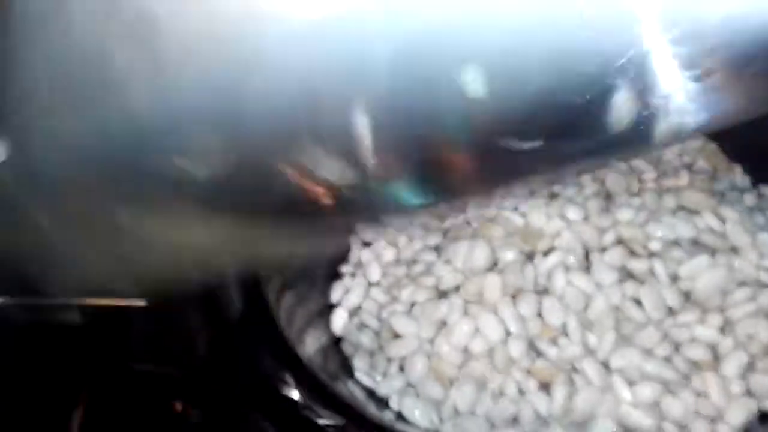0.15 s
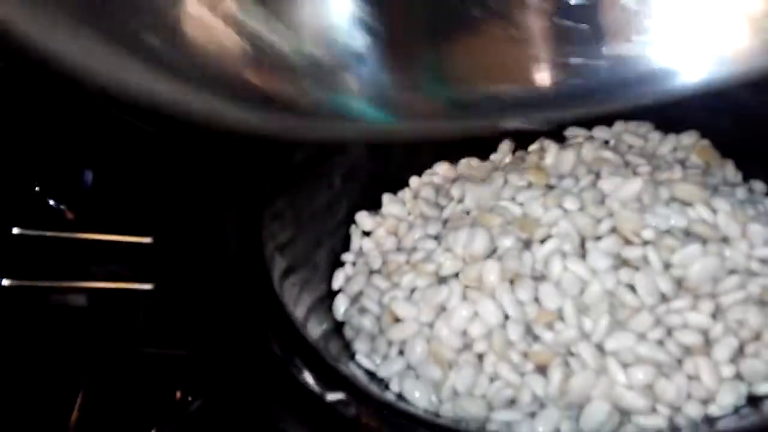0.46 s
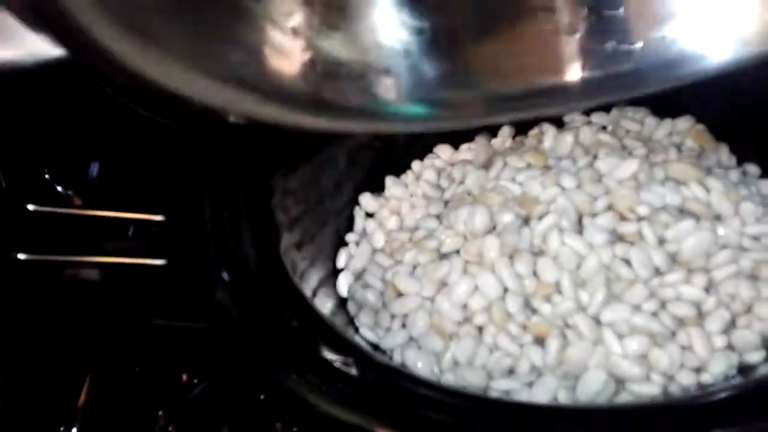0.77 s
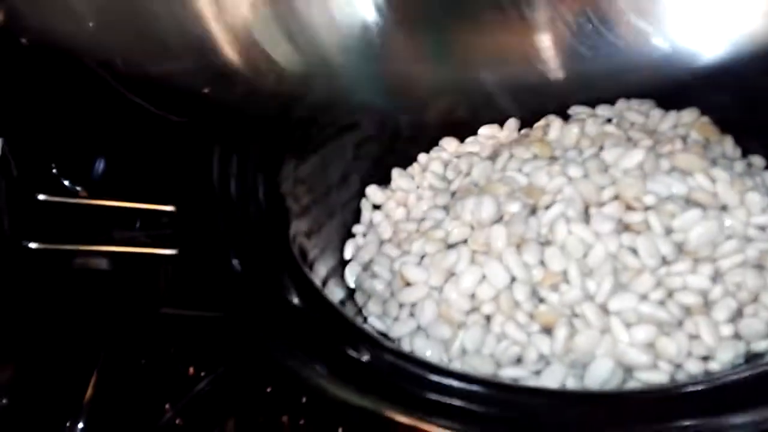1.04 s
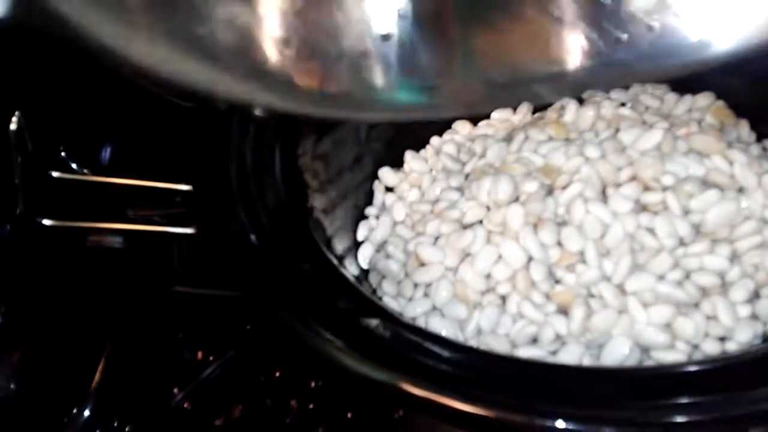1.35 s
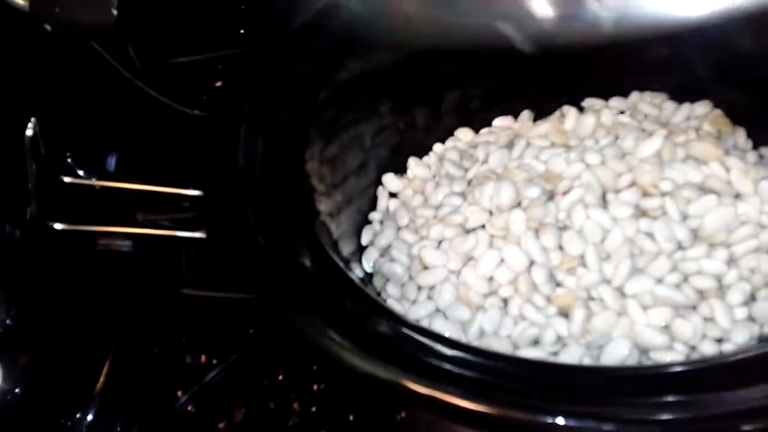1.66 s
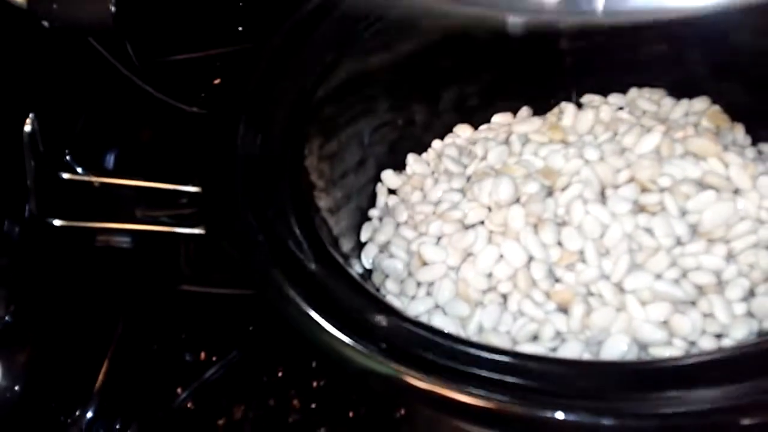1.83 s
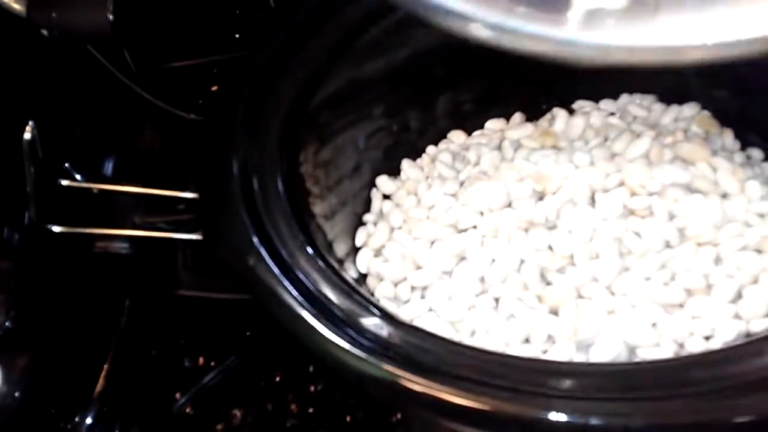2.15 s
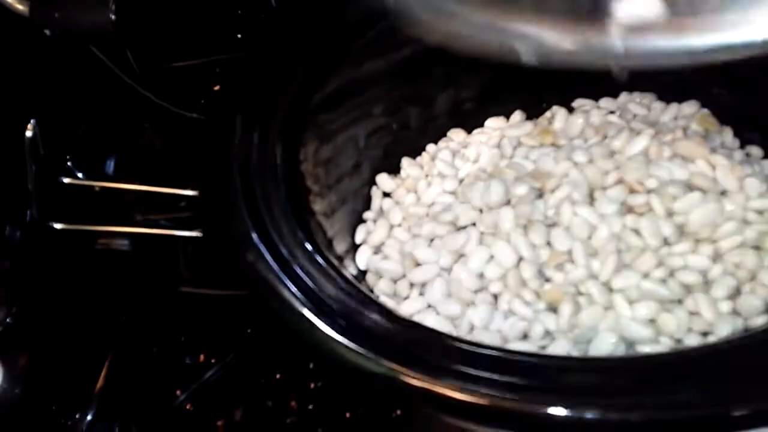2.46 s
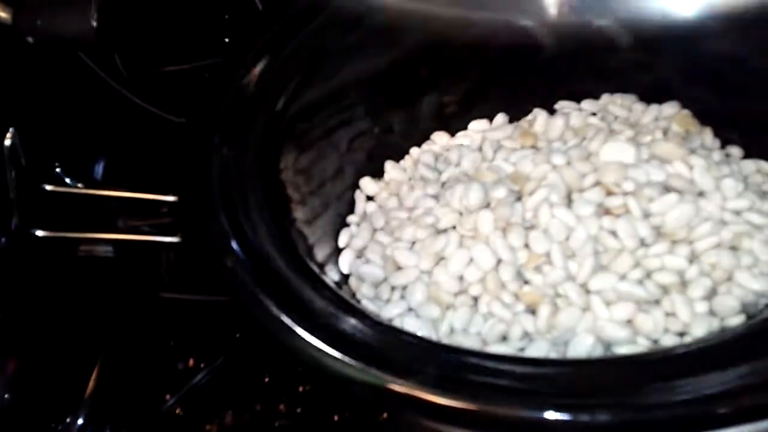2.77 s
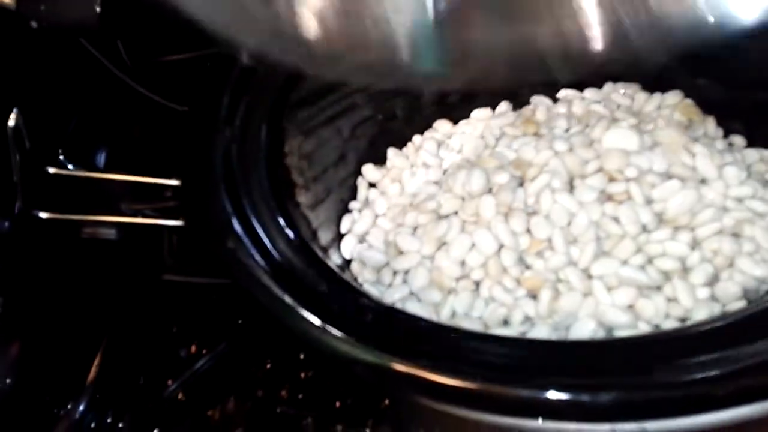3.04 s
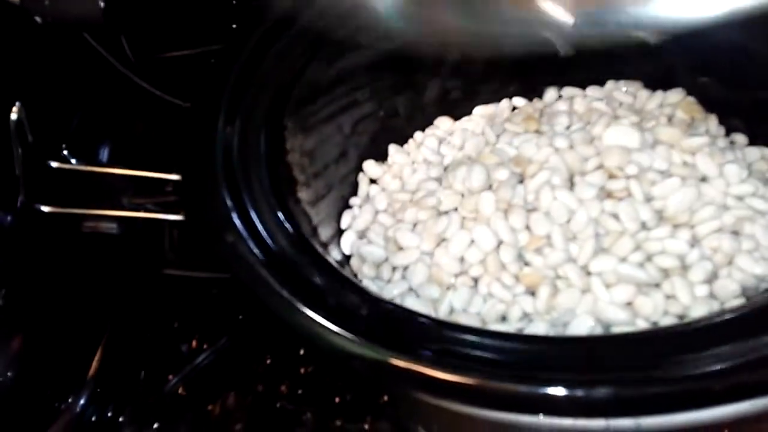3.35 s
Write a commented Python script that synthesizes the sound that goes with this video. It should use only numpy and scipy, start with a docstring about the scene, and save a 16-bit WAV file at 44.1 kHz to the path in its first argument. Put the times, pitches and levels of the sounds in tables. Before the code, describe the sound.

Metal colander clacks and rings briefly while wet beans drop into a ceramic pot; knocks thin out, soft rasping slides pass, quiet falls, then a final cluster of knocks. Close-up indoors over faint hum.

```python
"""Bright knocks on a steel colander, each a clack with a short ring, as the last wet beans go into a ceramic pot.
Knocks are noise bursts coloured by the shell plus decaying modes; some leave a single mode singing.
Beans slide over the steel (dense random grains), thud onto the heap (short sines, noise), tick, spatter and pock.
Close by in a kitchen; hum, faint room noise and a wavering low drone lie underneath."""
import sys
import numpy as np
from scipy import signal
from scipy.fft import rfft, irfft, next_fast_len
from scipy.io import wavfile
from scipy.ndimage import map_coordinates

SR = 44100
rng = np.random.default_rng(int(sys.argv[2]) if len(sys.argv) > 2 else 0)


def wav_out(sig):
    """Save sig, one row per channel (or a flat mono array), as 16-bit PCM at SR to the path in sys.argv[1]."""
    wavfile.write(sys.argv[1], SR, np.round(np.clip(np.atleast_2d(sig).T, -1, 1) * 32767).astype(np.int16))


N = 154350

# Room and background
# hum partials: freq_hz, level_db
HUM_PARTIALS = [(59.2, -49), (193.8, -65), (290.7, -63.5)]
# room noise spectrum: freq_hz, relative_db
FLOOR_COLOUR = [(28, -33.5), (38, -6), (78, -9), (98, -15), (135, -10.5), (215, -18.5), (400, -24),
                (920, -32.5), (1700, -41), (7500, -47.5), (9200, -44), (16000, -51.5)]
# reverberation time: freq_hz, t60_s
ROOM_DECAY = [(200, 0.19), (2500, 0.27), (6000, 0.13), (15000, 0.066)]
FLOOR_DB = -51.5
DRONE_DB, DRONE_HZ, DRONE_SHARPNESS = -63.5, 286.3, 6  # low resonance of the room noise
DRONE_WAVER_DB, DRONE_WAVERS_PER_S = 6.5, 7.8
ROOM_DB, ROOM_DELAY_S = -15, 0.0068
TOP_HZ = 15750

# Bowl
# colour band edges: edge_hz
BAND_EDGES = [450, 1500, 4200, 5400, 7200, 10200, 16000]
# bowl modes: freq_hz, relative_db (to the knock's band; to one another in the slide), t60_s
BOWL_MODES = [(825, -11, 0.1), (1250, -13, 0.19), (1620, -21, 0.15), (1900, -19, 0.2), (2540, -16.5, 0.2),
              (2982, -16.5, 0.19), (3521, -17, .18), (4700, -16, 0.16), (5256, -17, 0.12), (5512, -21, 0.2),
              (5776, -20, .2), (6280, -20, 0.16), (8492, -18, .2), (9620, -10.5, 0.11)]
RING_WAVER_HZ, RING_WAVER_RAD = 60, 0.5

# Sliding
# slide envelope of the rasp: time_s, level_db
SLIDE_LEVEL = [(0, -35.5), (.05, -47), (.1, -52.5), (.25, -46), (.3, -50), (.5, -55.5), (.9, -54.5),
               (1.03, -66), (1.06, -52.5), (1.14, -48), (1.165, -57), (1.21, -55.5), (1.232, -46),
               (1.275, -59.5), (1.305, -54.5), (1.36, -71), (1.39, -48.5), (1.44, -46), (1.49, -55.5),
               (1.522, -45.5), (1.55, -62), (1.569, -48.5), (1.635, -43), (1.67, -58.5), (1.85, -74),
               (2.64, -85), (2.7, -49.5), (2.76, -52.5), (2.85, -37.5), (2.885, -47.5), (2.93, -44.5),
               (2.975, -37), (3.03, -42.5), (3.11, -52), (3.18, -56.5), (3.35, -62), (3.5, -68)]
# slide spectrum: freq_hz, relative_db
SLIDE_SPECTRUM = [(300, -18.5), (800, -10), (1050, -14.5), (1300, -2), (1700, -7.5), (2600, -12.5),
                  (3800, -10.5), (4800, -1.5), (6100, 1.5), (7400, -5.5), (9100, -2.5), (10500, -13),
                  (16000, -22)]
# slide brightness: time_s, tilt_db_per_octave
SLIDE_BRIGHTNESS = [(1.06, -.5), (1.12, 2), (1.32, 4.5), (1.42, -2), (1.56, -2.5), (1.62, 2.5), (1.7, -1)]
SLIDE_PIVOT_HZ, SLIDE_RING_DB = 5500, -7.5
SLIDE_SURGE_DB, SURGES_PER_S = 2.8, 90
GRAINS_PER_S, GRAIN_SPREAD_DB = 9000, 1.5

# Beans
# pocks of beans rolling against the bowl: start_s, level_db, pitch_hz
POCK_EVENTS = [(1.061, -46.5, 1490), (1.564, -43.5, 1250), (2.953, -37, 1371), (3.108, -49, 1247),
               (3.405, -51, 2224), (3.408, -50.5, 3375)]
POCK_T60_S, POCK_RISE_S, POCK_Q = 0.11, 0.0025, 20
# beans landing on the heap: start_s, pitch_hz, plop_db, push_db
THUD_EVENTS = [(0.014, 415, -39.5, -43), (0.1741, 568, -25.5, -26.5), (.191, 634, -38, -40),
               (.2135, 460, -36, -49.5)]
# heap crunch spectrum: freq_hz, relative_db
HEAP_COLOUR = [(60, -17), (150, -1), (820, -6), (1050, -12), (3200, -5), (15000, -30)]
THUD_S, PUSH_RATIO = 0.012, 0.55  # plop length; push pitch / plop pitch
CRUNCH_DB, CRUNCH_DELAY_S, CRUNCH_T60_S = 7.5, 0.0026, 0.045  # heap gives way; dB re push
# wet ticks of single beans: start_s, level_db, pitch_hz
TICK_EVENTS = [(0.1154, -22, 9350), (.186, -22.5, 9940), (0.193, -25.5, 8514), (0.197, -32, 10040),
               (0.194, -33.5, 1980), (0.2047, -20, 8970), (1.053, -37, 6200), (1.725, -38, 3033),
               (1.729, -35.5, 7180), (1.761, -40, 7200), (3.22, -42, 2780), (3.228, -25, 8960),
               (3.292, -40.5, 8700), (3.449, -47, 6200)]
TICK_CYCLES, TICK_OCTAVES = 140, 0.65  # life to -60 dB; spectral width
TICK_TOP_HZ = 12000  # wet skins soften the top
# hissing spatters: start_s, level_db, t60_s
SPATTER_EVENTS = [(0.352, -29, 0.27), (.723, -32.5, 0.3)]
# spatter spectrum: freq_hz, relative_db
SPRAY_COLOUR = [(500, -10.5), (2000, -6.5), (5000, -3.5), (7000, -5), (9000, 4.5), (11000, -3), (15500, -7)]

# Blows on the colander
# singing single modes: start_s, mode_hz, level_db, hold_s, t60_s
CLANG_EVENTS = [(.121, 1250, -21.5, .026, .08), (.343, 1250, -42, .02, .25), (.556, 835, -37, .004, .08),
                (.643, 904, -46, .035, .1), (.643, 3700, -44, .032, .1), (2.662, 1650, -40, .004, .1),
                (2.803, 660, -40, .006, .1), (3.015, 1250, -38.5, .012, .1)]
CLANG_RISE_S, CLANG_WAVER_RAD = 0.002, 0.27  # waver at the second bowl mode, scaled with pitch
# knocks: start_s, ping_hz, clack_t60_s, then relative_db per band, low to high
KNOCK_EVENTS = [(0.1164, 4920, 0.063, -26, -18.5, -17, -23, -19.5, -31),
                (0.143, 5793, 0.021, -40, -29, -26.5, -18, -18.5, -23),
                (0.31, 4700, .035, -64, -49, -39, -41, -42, -58.5),
                (0.3423, 5765, .05, -48, -32, -30, -29.5, -32.5, -38.5),
                (0.4287, 5240, .035, -50, -38, -33, -31, -39.5, -50),
                (0.554, 4730, 0.054, -35.5, -28, -24, -28, -31, -42),
                (0.6354, 5200, .036, -41.5, -35.5, -26, -18.5, -34.5, -35.5),
                (0.665, 5260, 0.026, -42.5, -38.5, -37, -34, -42, -52),
                (0.816, 5280, 0.064, -43.5, -35, -30, -26.5, -30.5, -43.5),
                (0.833, 5230, .03, -51, -40, -36, -52, -58, -56),
                (0.9229, 5470, 0.043, -64, -47.5, -44, -48.5, -55, -65.5),
                (1.003, 5330, .035, -53, -52, -53, -50, -49.5, -55.5),
                (1.1749, 6410, 0.058, -55.5, -54, -40, -37, -42, -56.5),
                (1.406, 5140, 0.074, -57, -39.5, -38, -39.5, -41.5, -57),
                (2.661, 5287, 0.039, -43.5, -35.5, -29, -32, -30, -44.5),
                (2.777, 5780, 0.085, -59, -57, -50, -40.5, -42, -51),
                (2.8021, 5360, .032, -37.5, -27.5, -24.5, -24.5, -24.5, -35.5),
                (2.895, 5170, 0.059, -48, -38.5, -34, -40.5, -41, -56),
                (2.914, 4870, 0.049, -66, -40.5, -35.5, -35, -40, -51.5),
                (2.9563, 4650, .045, -52, -37, -30, -25.5, -29, -40.5),
                (2.9804, 5140, 0.014, -39, -32, -26.5, -40, -44, -48),
                (2.995, 5800, .04, -41.5, -36, -37, -31, -50, -60.5),
                (3.0147, 6040, .06, -47.5, -33.5, -30.5, -30.5, -35.5, -50.5),
                (3.056, 5180, 0.029, -47.5, -34.5, -31.5, -32.5, -31.5, -45.5)]
# struck steel spectrum: freq_hz, relative_db
STEEL_COLOUR = [(200, -22.5), (480, -9.5), (660, -5.5), (840, 0.5), (1060, -8), (1250, -2.5), (1480, -6),
                (1750, 0), (3000, 0), (3800, -0.5), (4800, 6), (5900, 14.5), (7300, 2.5), (8500, 8.5),
                (9700, 8), (10500, -5.5), (15500, -8)]
KNOCK_DB, RISE_S, HOLD_S = 0.5, 0.0018, 0.0055
CHATTER_DB, CHATTERS_PER_S = 2.2, 330
RIPPLE_DB, RIPPLE_HZ = 4, 169.5  # uneven ripple over the shell's spectrum
PING_DB, PING_T60_S = 6.5, 0.036  # strongest mode of the spot struck, re its band
DETUNE = 0.0013  # relative sd: the modes shift slightly from knock to knock
WASH_DB, WASH_T60_S = -11.5, 0.21  # diffuse after-ring of the shell
WASH_TILT_DB_PER_OCTAVE, WASH_PIVOT_HZ = -3, 3980


def amp(db):
    """Decibels to gain."""
    return 10 ** (np.asarray(db) / 20)


def unit(x):
    """Scale to rms 1."""
    return x / np.sqrt(np.mean(x ** 2) + 1e-20)


def along(points, hz):
    """Read (Hz, value) points on a log frequency axis."""
    f, v = np.transpose(points)
    return np.interp(np.log(hz + 1), np.log(f + 1), v)


def filtered(x, gain):
    """Apply a gain over frequency to x."""
    m = next_fast_len(len(x) + 8192)
    spectrum = rfft(x, m) * gain(np.fft.rfftfreq(m, 1 / SR))
    return irfft(spectrum, m)[:len(x)]


def noise(gain, size):
    """Coloured noise of rms 1."""
    return unit(filtered(rng.standard_normal(size), gain))


def fade(t, t60):
    """Exponential decay, -60 dB at t60."""
    return np.exp(-np.log(1000) * t / max(t60, 1e-4))


def sine(hz, t):
    """Sine of rms 1 and random phase."""
    return np.sqrt(2) * np.sin(2 * np.pi * (hz * t + rng.random()))


def wobble(rate, t):
    """Smooth random curve, rate knots per unit of t."""
    return map_coordinates(rng.standard_normal(2048), [t * rate], mode="wrap")


def burst(gain, envelope):
    """Coloured noise under an envelope, with the envelope's energy."""
    shaped = noise(gain, len(envelope)) * envelope
    return unit(shaped) * np.sqrt(np.mean(envelope ** 2))


def band(f, lo, hi):
    """Gain of one colour band; the lowest has a gentler lower slope."""
    slope = 4 if lo == BAND_EDGES[0] else 40
    return 1 / np.sqrt((1 + (lo / (f + 1)) ** slope) * (1 + (f / hi) ** 40))


def add(out, s, x):
    """Mix x into out at time s."""
    i = max(round(s * SR), 0)
    out[i:i + len(x)] += x[:max(len(out) - i, 0)]


def event_time():
    """Time axis of one event, 0.5 s."""
    return np.arange(SR // 2) / SR


def in_room(x):
    """Add a kitchen tail: delayed noise whose decay time depends on frequency."""
    hz, t, z = signal.stft(rng.standard_normal(SR // 2), SR, nperseg=256)
    decay = np.exp(-np.log(1000) * t / along(ROOM_DECAY, hz)[:, None])
    tail = signal.istft(z * decay, SR, nperseg=256)[1]
    tail = tail / np.linalg.norm(tail)
    out = x.copy()
    add(out, ROOM_DELAY_S, amp(ROOM_DB) * signal.fftconvolve(x, tail))
    return out


def ringing(hz, t60, t):
    """One decaying bowl mode; the beans lying in it unsettle its phase."""
    waver = RING_WAVER_RAD * wobble(RING_WAVER_HZ, t)
    tone = np.sqrt(2) * np.sin(2 * np.pi * (hz * t + rng.random()) + waver)
    return tone * fade(t, t60)


def kitchen():
    """Appliance hum over steady room noise and a faint wavering drone."""
    t = np.arange(N) / SR
    hum = sum(amp(db) * sine(hz, t) for hz, db in HUM_PARTIALS)
    floor = amp(FLOOR_DB) * noise(lambda f: amp(along(FLOOR_COLOUR, f)), N)

    def resonance(f):
        detuning = f / DRONE_HZ - DRONE_HZ / (f + 1)
        return 1 / (1 + (DRONE_SHARPNESS * detuning / 2) ** 2)

    drone_level = amp(DRONE_DB + DRONE_WAVER_DB * wobble(DRONE_WAVERS_PER_S, t))
    return hum + floor + drone_level * noise(resonance, N)


def sliding():
    """Dense little slips over the perforated steel surge band by band and stir the bowl's modes."""
    t, clock = event_time(), np.arange(N) / SR
    hits = rng.random(N) < GRAINS_PER_S / SR
    slips = hits * rng.standard_normal(N) * amp(GRAIN_SPREAD_DB * rng.standard_normal(N))
    steady = unit(filtered(slips, lambda f: amp(along(SLIDE_SPECTRUM, f))))
    tilt_db = np.interp(clock, *np.transpose(SLIDE_BRIGHTNESS))
    rasp = np.zeros(N)
    for lo, hi in zip(BAND_EDGES, BAND_EDGES[1:]):
        octaves = np.log2(np.sqrt(lo * hi) / SLIDE_PIVOT_HZ)
        surge_db = SLIDE_SURGE_DB * wobble(SURGES_PER_S, clock)
        rasp += filtered(steady, lambda f: band(f, lo, hi) ** 2) * amp(tilt_db * octaves + surge_db)
    bowl = sum(amp(db) * ringing(hz, t60, t) for hz, db, t60 in BOWL_MODES)
    ring = unit(signal.fftconvolve(rasp, bowl)[:N])
    level = amp(np.interp(clock, *np.transpose(SLIDE_LEVEL)))
    return level * (rasp + amp(SLIDE_RING_DB) * ring)


def pocks():
    """Soft contacts that sound one narrow resonance."""
    out, t = np.zeros(N), event_time()
    envelope = fade(t, POCK_T60_S) * np.minimum(t / POCK_RISE_S, 1)
    for s, db, hz in POCK_EVENTS:
        resonance = lambda f: 1 / np.hypot(1, POCK_Q * (f / hz - hz / (f + 1)))
        add(out, s, amp(db) * burst(resonance, envelope))
    return out


def thuds():
    """Beans hit the heap: a short plop and a deeper push, then the crunch of the heap giving way."""
    out, t = np.zeros(N), event_time()
    swell = np.sin(np.pi * np.minimum(t / THUD_S, 1))
    for s, hz, plop_db, push_db in THUD_EVENTS:
        plop = amp(plop_db) * sine(hz, t)
        push = amp(push_db) * sine(PUSH_RATIO * hz, t)
        add(out, s, in_room(swell * (plop + push)))
        crunch = burst(lambda f: amp(along(HEAP_COLOUR, f)), fade(t, CRUNCH_T60_S))
        add(out, s + CRUNCH_DELAY_S, in_room(amp(push_db + CRUNCH_DB) * crunch))
    return out


def ticks():
    """Single wet beans: noise around one pitch, shorter the higher it is."""
    out, t = np.zeros(N), event_time()
    for s, db, hz in TICK_EVENTS:
        def colour(f):
            octaves = np.log2((f + 1) / hz)
            peak = 1 / (1 + (octaves / TICK_OCTAVES) ** 2) ** 2
            return peak / np.hypot(1, (f / TICK_TOP_HZ) ** 4)

        add(out, s, in_room(amp(db) * burst(colour, fade(t, TICK_CYCLES / hz))))
    return out


def spatters():
    """Bright hisses: coloured noise with exponential decay."""
    out, t = np.zeros(N), event_time()
    for s, db, t60 in SPATTER_EVENTS:
        add(out, s, amp(db) * burst(lambda f: amp(along(SPRAY_COLOUR, f)), fade(t, t60)))
    return out


def clangs():
    """A single mode swells, holds while the rim stays in contact, then dies; higher modes waver more."""
    out, t = np.zeros(N), event_time()
    rise = 1 - np.exp(-t / CLANG_RISE_S)
    for s, hz, db, hold_s, t60 in CLANG_EVENTS:
        waver = CLANG_WAVER_RAD * hz / BOWL_MODES[1][0] * wobble(RING_WAVER_HZ, t)
        tone = np.sqrt(2) * np.sin(2 * np.pi * hz * t + waver)
        add(out, s, amp(db) * tone * fade(np.maximum(t - hold_s, 0), t60) * rise)
    return out


def knocks():
    """Crowded shell modes clack and wash, a ping and clear modes ring; the spot struck sets the colour."""
    out, t = np.zeros(N), event_time()
    swell = np.minimum(t / RISE_S, 1)
    wash = swell * fade(t, WASH_T60_S)
    chatter_onset = np.minimum(t / HOLD_S / 2, 1)

    def steel(f):
        return amp(along(STEEL_COLOUR, f) + RIPPLE_DB * wobble(1 / RIPPLE_HZ, f))

    for s, ping_hz, clack_t60, *levels_db in KNOCK_EVENTS:
        def strength(hz):
            return amp(levels_db[np.searchsorted(BAND_EDGES, hz) - 1])

        chatter = amp(CHATTER_DB * wobble(CHATTERS_PER_S, t) * chatter_onset)
        clack = swell * fade(np.maximum(t - HOLD_S, 0), clack_t60) * chatter
        shell = np.zeros(len(t))
        for db, lo, hi in zip(levels_db, BAND_EDGES, BAND_EDGES[1:]):
            octaves = np.log2(np.sqrt(lo * hi) / WASH_PIVOT_HZ)
            wash_gain = amp(WASH_DB + WASH_TILT_DB_PER_OCTAVE * octaves)
            envelope = np.hypot(clack, wash_gain * wash)
            shell += amp(db) * burst(lambda f: steel(f) * band(f, lo, hi), envelope)
        ping = amp(PING_DB) * strength(ping_hz) * ringing(ping_hz, PING_T60_S, t)
        ring = np.zeros(len(t))
        for hz, db, t60 in BOWL_MODES:
            shifted_hz = hz * (1 + DETUNE * rng.normal())
            ring += strength(hz) * amp(db) * ringing(shifted_hz, t60, t)
        add(out, s, amp(KNOCK_DB) * in_room(shell + (ping + ring) * swell))
    return out


def scene():
    """All sources at one microphone."""
    beans = sliding() + pocks() + thuds() + ticks() + spatters()
    return (kitchen() + beans + clangs() + knocks())[None]


def record(dry):
    """The recorder keeps nothing above its band limit."""
    return np.array([filtered(x, lambda f: f < TOP_HZ) for x in dry])


dry = scene()
out = record(dry)
wav_out(out)
```